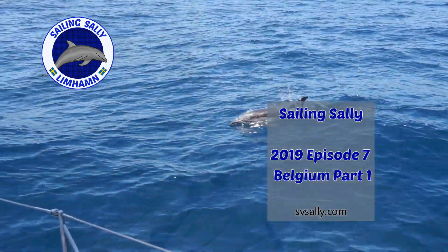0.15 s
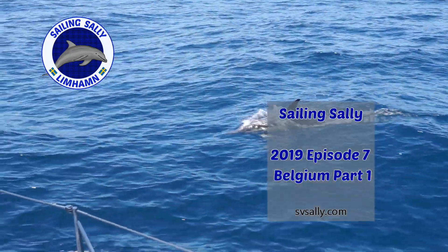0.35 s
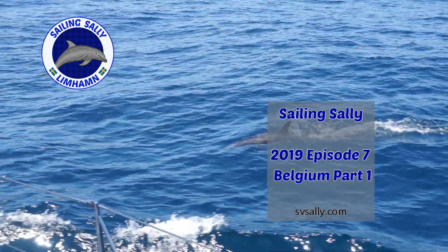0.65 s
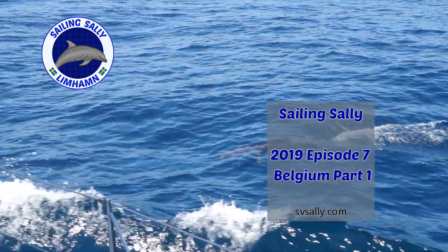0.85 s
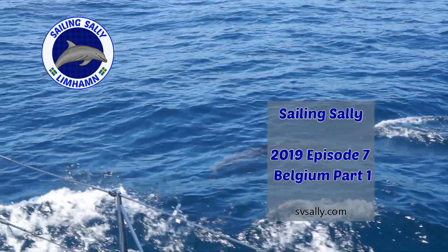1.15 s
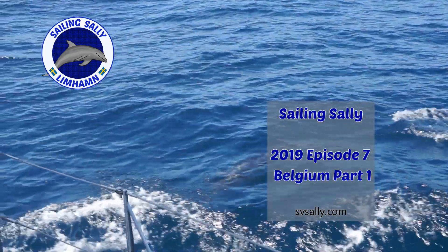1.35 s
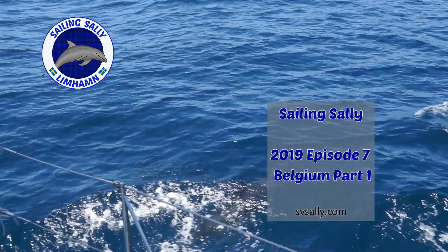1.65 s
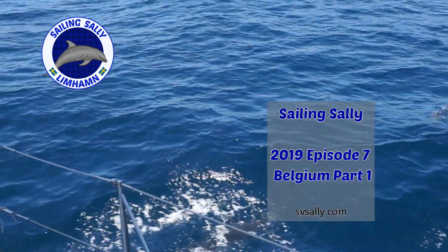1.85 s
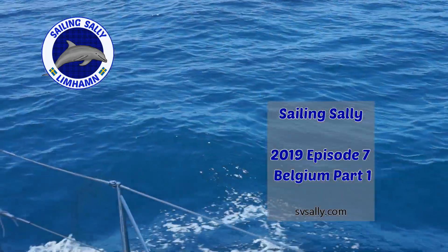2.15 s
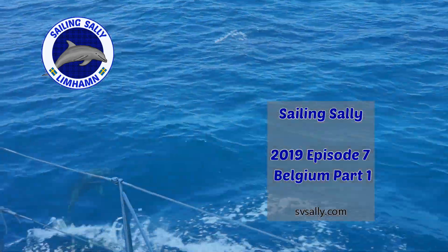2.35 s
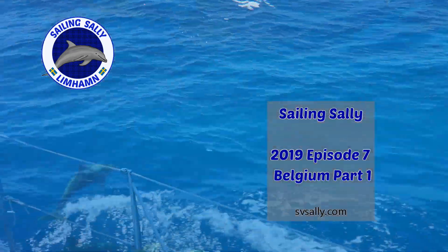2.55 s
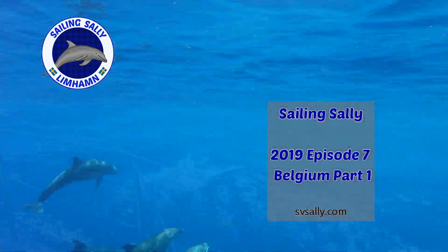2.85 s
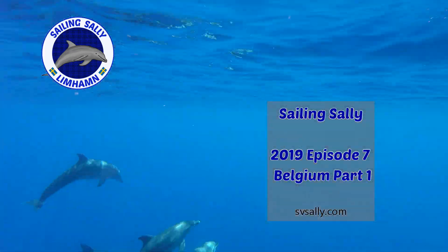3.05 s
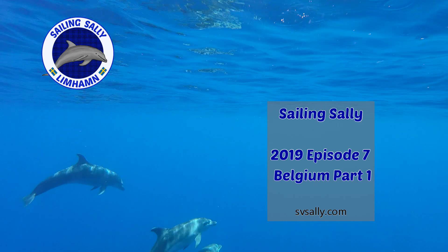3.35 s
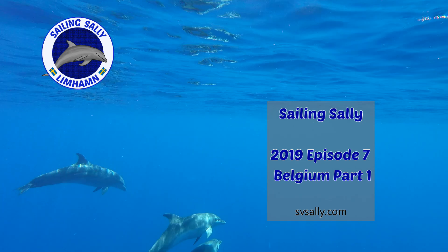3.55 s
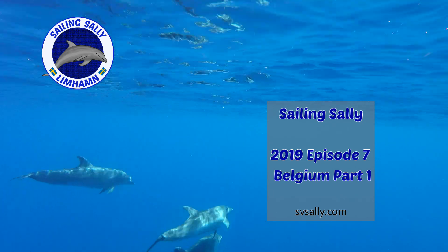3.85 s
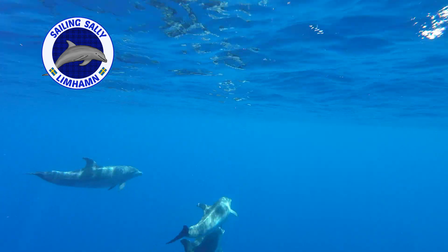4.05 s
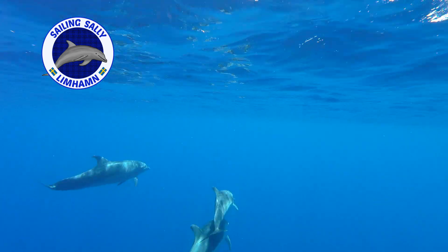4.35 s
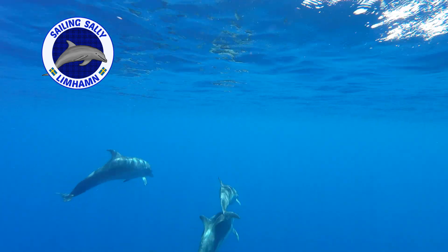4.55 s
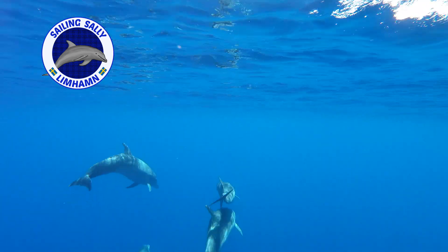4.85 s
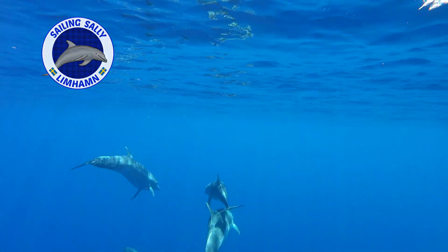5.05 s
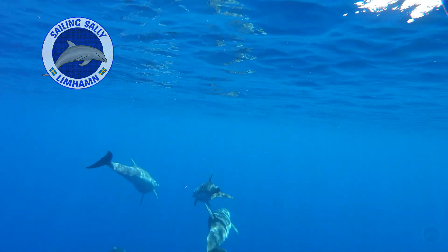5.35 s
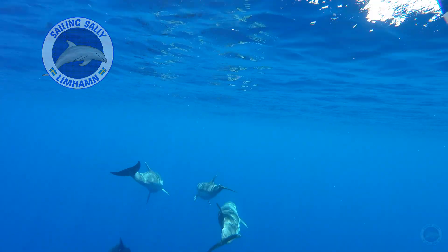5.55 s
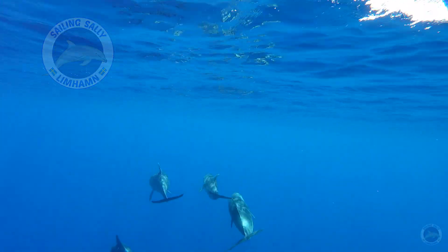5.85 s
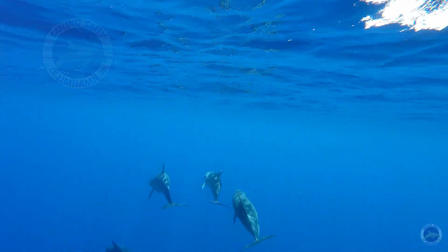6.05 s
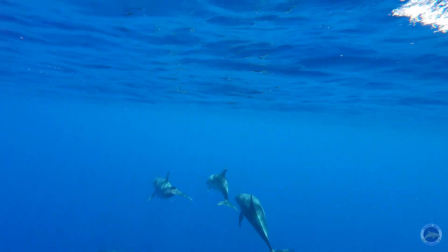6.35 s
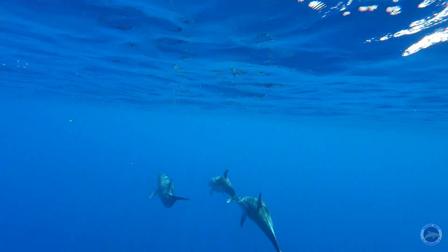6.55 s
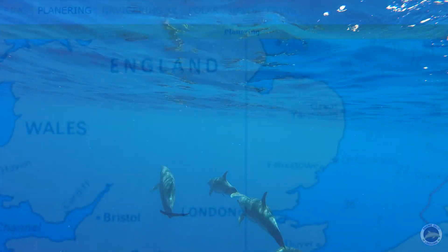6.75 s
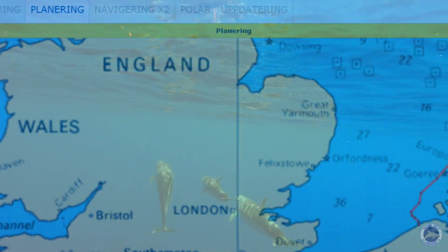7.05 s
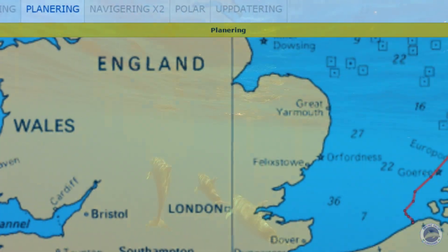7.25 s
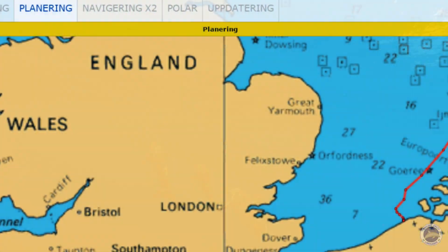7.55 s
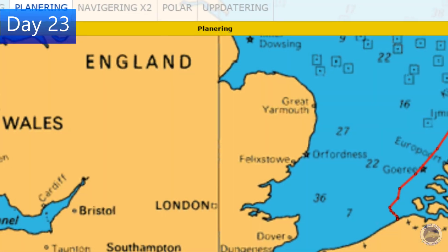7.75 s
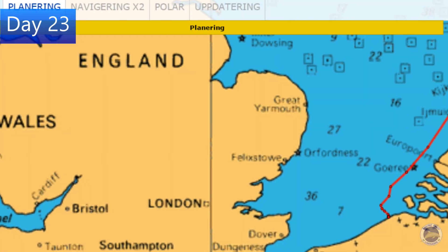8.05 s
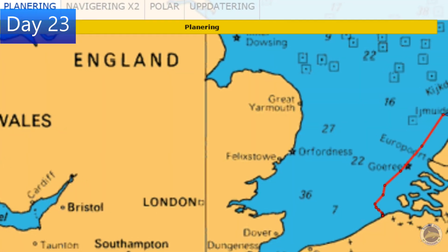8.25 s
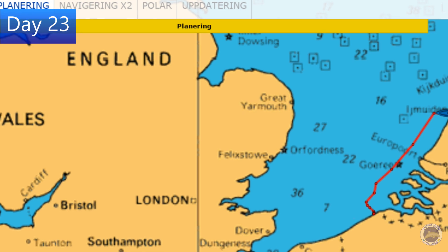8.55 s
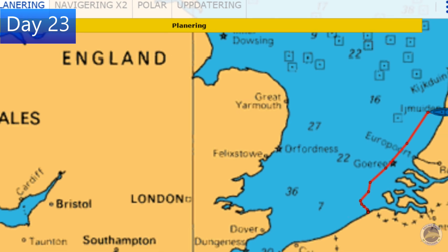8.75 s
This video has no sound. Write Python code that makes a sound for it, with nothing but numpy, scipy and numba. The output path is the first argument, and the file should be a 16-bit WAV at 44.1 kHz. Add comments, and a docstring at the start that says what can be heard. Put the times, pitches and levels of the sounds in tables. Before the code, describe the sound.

For the first two seconds, waves break close by at the bow of a sailing yacht, in stereo: bubbling wash, pattering droplets and hissing foam, with the sharpest splashes around 1.3 seconds. Between 2 and 3 seconds this dissolves into muffled mono sound under water. The flow makes a steady low rumble against a towed camera pole, while bubbles gurgle, fizz and plop dully and irregularly on the housing, with a few sharp ticks. Two very faint, high, falling dolphin whistles come at about 4.1 and 4.9 seconds, and two barely audible high dolphin clicks at about 6.6 and 7 seconds. At 7.6 seconds the sound cuts abruptly back to the deck. Wind rushes and a long wave runs along the hull, its foam sizzling at the crest around 8.5 seconds, followed by a couple of low sloshing surges just before the end, near 9 seconds.

```python
"""Bubbling wash and spray break from the bow of a sailing yacht: trapped air rings as bubbles, and
droplets patter over hissing foam. The sound dissolves to a camera towed under water, where eddies shake
its pole, bubbles gurgle dully through the housing and dolphins whistle and click faintly. Then it is
abruptly back on deck, in wind and the hiss of a long wave. Each bubble is a damped oscillator."""
import sys
import numpy as np
from scipy import signal
from scipy.fft import rfft, irfft
from scipy.io import wavfile
from scipy.ndimage import uniform_filter1d
from numba import njit

SR = 44100
rng = np.random.default_rng(int(sys.argv[2]) if len(sys.argv) > 2 else 0)


def wrap_up_sound(samples):
    """Save the sound to the file named by the first command line argument, as 16-bit audio."""
    columns = np.atleast_2d(samples).T
    # keep every value between -1 and 1, then stretch to whole-number steps
    tamed = np.clip(columns, -1, 1)
    steps = np.round(tamed * 32767).astype(np.int16)
    wavfile.write(sys.argv[1], SR, steps)


N = 392049
T = np.arange(N) / SR
HZ = np.maximum(np.fft.rfftfreq(N, 1 / SR), 1)


def undb(db):
    """Amplitude ratio of a level in decibels."""
    return 10 ** (np.asarray(db) / 20)


def unit(x):
    """Normalisation to an rms of 1."""
    return x / np.sqrt(np.mean(x ** 2))


def curves(rows):
    """Linear interpolation of each column over the times in the first."""
    times, *columns = np.transpose(rows)
    return [np.interp(T, times, column) for column in columns]


def over_hz(points):
    """Interpolation of (frequency [Hz], value) points on a logarithmic frequency axis."""
    hz, value = np.transpose(points)
    return np.interp(np.log(HZ), np.log(hz), value)


def shape(x, gain):
    """Linear filtering: the spectrum is multiplied by a gain per frequency."""
    return irfft(rfft(x) * gain, N)


def band(lo_hz, hi_hz, order=6):
    """Magnitude response of a Butterworth high-pass and low-pass in series."""
    return ((1 + (lo_hz / HZ) ** (2 * order)) * (1 + (HZ / hi_hz) ** (2 * order))) ** -.5


def wander(rate):
    """Smooth random modulation of rms 1, with `rate` new values a second."""
    hold = int(SR / rate)
    steps = np.repeat(rng.standard_normal(N // hold + 2), hold)
    return unit(uniform_filter1d(steps[rng.integers(hold):][:N], hold))


@njit
def ring(times, hz, cycles, size, glide):
    """Damped oscillation: each bubble swells quickly and decays, its pitch rising by the share `glide`."""
    out = np.zeros(N)
    for k in range(len(times)):
        start, length = int(times[k] * SR), int(cycles[k] * SR / hz[k]) + 2
        phase = 0.
        for i in range(min(length, N - start)):
            age = i / length
            phase += 2 * np.pi * hz[k] * (1 + glide * (age - .15)) / SR
            envelope = 2.3 * (1 - np.exp(-18 * age)) * np.exp(-7 * age)
            out[start + i] += size[k] * envelope * np.sin(phase)
    return out


def bubbles(rate, lo_hz, hi_hz, cycles, spread_db, glide=0.24):
    """Random superposition of bubbles, a few of them loud, at the spectral density of unit white noise."""
    when, pitch, sustain, luck = rng.random((int(rate * N / SR), 4)).T
    hz = lo_hz * (hi_hz / lo_hz) ** pitch
    size = hz * undb(-spread_db * np.log(luck + .01))
    cloud = ring(when * N / SR, hz, cycles * (.5 + sustain), size, glide)
    return unit(cloud) * np.sqrt(2 * (hi_hz - lo_hz) / SR)


# Contour of one whistle: (time from onset [s], frequency [Hz], relative level [dB])
WHISTLE_CONTOUR = [(0, 10050, -16), (.05, 9550, -10), (.11, 8650, -11), (.16, 7800, -11), (.22, 7400, -2),
                   (.31, 6900, -1), (.37, 6300, 0), (.405, 6150, -1), (.44, 7400, -18)]
# Dolphin calls: (onset [s], gain [dB], frequency ratio [1])
DOLPHIN_CALLS = [(4.13, -82, 1), (4.935, -87.5, .975)]


def dolphin_whistles():
    """Frequency modulation: a faint, wavering, falling whistle sounds twice, with a surface reflection."""
    direct = 0
    for start, call_db, pitch in DOLPHIN_CALLS:
        hz, db = curves([(start + s, hz, db) for s, hz, db in WHISTLE_CONTOUR])
        phase = 2 * np.pi * np.cumsum(pitch * hz * (1 + .005 * wander(200))) / SR
        waver = undb(3 * wander(50) - 5)
        sounding = (T > start) & (T < start + WHISTLE_CONTOUR[-1][0])
        direct = direct + np.sin(phase) * undb(call_db + db) * waver * sounding
    reflection = undb(-9) * np.roll(direct, int(.012 * SR))
    return direct + reflection


# Modes of the camera pole: (frequency [Hz], nominal width [Hz], relative level [dB])
POLE_MODES = [(29.5, 31, -2), (57, 27, 0), (76.3, 23, 0.5), (106, 5, -2), (126.5, 18, -4)]
# Rumble of the flow past the pole: (time [s], level [dB])
FLOW_LEVELS = [(2.2, -31), (2.84, -30.5), (2.93, -30), (3.86, -31), (3.94, -35.5), (4.64, -30),
               (7.36, -32.5), (7.48, -38.5), (7.6, -34.5)]


def pole_rumble():
    """Forced vibration: eddies buffet the camera pole, which booms in its low modes."""
    power = sum(undb(2 * db) / (1 + ((HZ ** 2 - hz ** 2) / (HZ * width)) ** 2) ** 1.93
                for hz, width, db in POLE_MODES)
    boom = unit(shape(rng.standard_normal(N), np.sqrt(power)))
    # the steady tow keeps the buffeting even from moment to moment
    running_rms = np.sqrt(uniform_filter1d(uniform_filter1d(boom ** 2, size=3000), size=1500))
    flow_db, = curves(FLOW_LEVELS)
    return boom / running_rms * undb(flow_db)


# Transmission through the housing: (frequency [Hz], relative gain [dB])
HOUSING_RESPONSE = [(60, -27), (170, -11.5), (245, -14), (330, -15.5), (520, -15.5), (700, -12.5),
                    (880, -11), (1100, -23), (1350, -28), (2400, -36.5), (2900, -48), (3400, -59.5),
                    (4000, -76), (6000, -82.5)]
# Large air pockets churning round the pole: (time [s], level [dB])
CHURN_LEVELS = [(2.7, -43), (2.93, -39.5), (3.72, -42.5), (4.04, -47.5), (5.0, -38.5), (5.1, -44.5),
                (5.75, -41), (5.93, -37.5), (6.07, -37), (6.22, -47), (6.8, -49), (7.12, -42.5),
                (7.41, -35.5), (7.6, -35.5)]
# Bubble trains shed by the pole: (time [s], gain [dB], frequency [Hz])
BUBBLE_TRAINS = [(2.6, -37, 918), (2.7, -35.5, 490), (2.82, -40.5, 601), (2.93, -34, 782), (3.08, -38, 818),
                 (3.26, -33.5, 585), (3.6, -36, 716), (3.65, -35.5, 486), (4.21, -34, 747),
                 (4.31, -35.5, 539), (4.39, -38, 688), (4.52, -41.5, 642), (4.79, -41, 697),
                 (4.86, -34, 568), (4.98, -41, 735), (5.1, -36.5, 716), (5.33, -38, 717), (5.57, -37, 660),
                 (5.73, -33.5, 750), (5.9, -38.5, 493), (6.03, -36.5, 741), (6.15, -37.5, 750),
                 (6.24, -34.5, 681), (6.41, -34.5, 705), (6.49, -36, 776), (7.16, -37, 796),
                 (7.34, -34, 485), (7.4, -33, 648), (7.58, -38, 630)]
# Fizz of small bubbles: (time [s], level [dB])
FIZZ_LEVELS = [(2.8, -57.5), (3.08, -47), (3.42, -54), (3.65, -46.5), (3.97, -59), (4.2, -56.5),
               (4.32, -65.5), (4.6, -56), (4.85, -58), (5.06, -56.5), (5.42, -54.5), (5.74, -57.5),
               (5.95, -58.5), (6.17, -49.5), (6.34, -50.5), (6.65, -55), (6.82, -46.5), (7.03, -57.5),
               (7.35, -50), (7.6, -53)]


def gurgle():
    """Transmission loss: the housing dulls the churn, gurgle and fizz of air dragged down by the pole."""
    churn_db, = curves(CHURN_LEVELS)
    gurgle_db, train_hz = curves(BUBBLE_TRAINS)
    fizz_db, = curves(FIZZ_LEVELS)
    wall = undb(over_hz(HOUSING_RESPONSE))
    large = bubbles(rate=350, lo_hz=129.8, hi_hz=1311, cycles=38, spread_db=2.5)
    small = bubbles(rate=800, lo_hz=1320, hi_hz=3400, cycles=16, spread_db=3.7, glide=.08)
    cloud = large + small + undb(-3) * rng.standard_normal(N)
    bands_hz = [(100, 420), (420, 1200), (1200, 2600), (2600, 14000)]
    churn, rush, fizz, fine = (unit(shape(cloud, wall * band(lo, hi, order=8))) for lo, hi in bands_hz)
    # bubbles shed together, 110 a second, are of nearly one size
    when, luck, scatter = rng.random((int(110 * N / SR), 3)).T
    hz = train_hz[(when * (N - 1)).astype(int)] * 2 ** (.75 * (scatter - .55))
    train = ring(when * N / SR, hz, cycles=22 + 20 * luck, size=undb(2 * luck), glide=0.13)
    gurgling = (undb(-4.5) * rush + undb(-5) * unit(shape(train, wall))) * undb(gurgle_db)
    fine_db = -66.5 + 0.13 * (fizz_db - fizz_db.mean())  # the smallest follow the fizz only weakly
    clusters = undb(2 * wander(rate=32))  # small bubbles arrive in clusters
    fizzing = (fizz * undb(fizz_db) + fine * undb(fine_db)) * clusters
    return churn * undb(churn_db) + gurgling + fizzing


# Large bubbles plopping against the housing: (time [s], level [dB], frequency [Hz])
HOUSING_PLOPS = [(2.407, -24.5, 644), (2.606, -25, 824), (2.65, -34.5, 1689), (2.655, -26.5, 810),
                 (2.676, -26, 419), (2.744, -24, 535), (2.889, -37.5, 1300), (2.978, -29, 800),
                 (3.042, -26, 689), (3.069, -23.5, 910), (3.072, -34.5, 1690), (3.118, -26.5, 730),
                 (3.207, -29.5, 605), (3.207, -35, 1380), (3.264, -30, 525), (3.282, -29.5, 699),
                 (3.337, -29, 727), (3.357, -33, 576), (3.599, -33, 1850), (3.659, -24.5, 443),
                 (3.718, -35, 1620), (3.794, -28.5, 450), (3.83, -37, 1900), (3.84, -25, 430),
                 (3.876, -30, 510), (3.899, -25.5, 640), (3.997, -27.5, 578), (4.055, -28, 708),
                 (4.078, -37, 1380), (4.098, -26.5, 753), (4.136, -39, 1510), (4.145, -25, 750),
                 (4.213, -22.5, 792), (4.213, -34, 1248), (4.27, -26, 666), (4.288, -22.5, 507),
                 (4.372, -26, 713), (4.407, -42, 1315), (4.413, -29, 743), (4.446, -27, 721),
                 (4.448, -45, 1350), (4.525, -27, 590), (4.598, -25, 590), (4.641, -24.5, 570),
                 (4.734, -29, 877), (4.746, -24, 877), (4.827, -24, 632), (4.843, -33, 446),
                 (4.868, -27.5, 556), (4.881, -42, 1940), (4.911, -43.5, 1360), (4.921, -25, 810),
                 (4.931, -26.5, 795), (4.993, -40, 1400), (5.057, -25.5, 702), (5.079, -26.5, 757),
                 (5.131, -36, 2010), (5.27, -27, 644), (5.334, -35, 1300), (5.393, -34.5, 1540),
                 (5.399, -29, 526), (5.458, -39.5, 1750), (5.54, -38.5, 2380), (5.611, -37, 1446),
                 (5.682, -39, 1515), (5.717, -27.5, 840), (5.762, -26.5, 684), (5.782, -28.5, 408),
                 (5.801, -24, 702), (5.801, -41, 1720), (5.961, -27, 698), (5.987, -32, 1346),
                 (6.171, -37, 1740), (6.202, -28, 850), (6.238, -25.5, 680), (6.256, -38, 1570),
                 (6.292, -28, 680), (6.305, -26.5, 666), (6.31, -33.5, 1475), (6.349, -25, 750),
                 (6.391, -29, 670), (6.408, -27, 930), (6.446, -34.5, 1900), (6.446, -26, 980),
                 (6.484, -25, 680), (6.642, -25.5, 885), (6.825, -37, 1400), (6.908, -38, 1525),
                 (6.99, -29, 792), (7.019, -24.5, 740), (7.065, -24.5, 733), (7.086, -38, 1375),
                 (7.136, -34, 1650), (7.175, -24, 790), (7.197, -30, 305), (7.278, -36.5, 1800),
                 (7.284, -27.5, 225), (7.313, -28.5, 446), (7.368, -26, 234), (7.41, -26, 240),
                 (7.416, -34, 742), (7.474, -38, 2020), (7.5, -26, 588), (7.51, -23.5, 773),
                 (7.602, -25, 820)]
# Sharp ticks under water, and two faint, high bursts of dolphin clicks (at 6.625 s and 7.025 s):
# (time [s], level [dB], frequency [Hz], duration [cycles])
TICKS_AND_CLICKS = [(3.656, -53, 2000, 3.2), (4.746, -42.5, 2000, 3.2), (5.058, -40, 1990, 3.6),
                    (5.402, -50, 2010, 2.8), (6.329, -43, 2000, 3.5), (6.447, -46, 2000, 3.2),
                    (6.625, -68, 7500, 45), (7.025, -69.5, 7200, 18), (7.358, -63, 4280, 5),
                    (7.423, -61.5, 2000, 3.2)]


def plops_and_clicks():
    """Damped transients: bubbles plop on the housing amid sharp ticks, dolphin clicks and faint crackle."""
    times, db, hz = np.array(HOUSING_PLOPS, float).T.copy()
    plops = ring(times, hz, cycles=rng.uniform(20.313, 29.463, len(times)), size=undb(db), glide=0.11)
    times, db, hz, cycles = np.array(TICKS_AND_CLICKS, float).T.copy()
    clicks = ring(times, hz, cycles, undb(db), glide=0.12)
    crackle = unit(bubbles(rate=60, lo_hz=3500, hi_hz=8000, cycles=7, spread_db=3.5)) * undb(-102)
    return shape(plops, band(100, 3900, order=8)) + shape(clicks + crackle, band(500, 9000, order=4))


# Likeness of the two deck microphones: (frequency [Hz], correlation before scaling by `likeness` [1])
DECK_CORRELATION = [(60, .7), (130, .6), (300, 0.75), (650, 0.95), (1400, 0.84), (3100, 0.12), (7000, .02)]


def stereo_pair(source, likeness):
    """Partial coherence: two draws of a source mix to channels alike in the bass, unlike in the treble."""
    correlation = np.clip(likeness * over_hz(DECK_CORRELATION), -.99, .99)
    mid = shape(source(), np.sqrt(1 + correlation))
    side = shape(source(), np.sqrt(1 - correlation))
    return np.array([mid + side, mid - side])


# Waves breaking beside the boat: (crest time [s], slosh level [dB], wash level [dB], spray level [dB],
# rise constant [s], decay constant [s], left minus right [dB])
WAVE_CRESTS = [(0.053, -42, -39, -35.5, 0.022, 0.027, -3), (0.235, -49.5, -41, -37.5, 0.075, 0.37, 0),
               (0.33, -54, -50, -47, 0.04, 0.09, 0.5), (0.39, -50.5, -37, -36, 0.12, 0.33, 2.5),
               (0.59, -52, -46, -41.5, 0.088, 0.04, -10), (0.785, -50, -34.5, -34.5, 0.17, 0.11, 4),
               (0.84, -52, -38.5, -35.5, 0.04, 0.11, 0), (1.0, -50.5, -40, -41.5, 0.056, 0.22, 5),
               (1.165, -62, -34, -33.5, 0.081, 0.074, 0.5), (1.295, -67, -36.5, -30.5, 0.062, 0.04, -0.5),
               (1.333, -65, -35, -31.5, 0.019, 0.045, -1), (1.467, -70, -49, -42.5, 0.034, 0.068, -2),
               (1.68, -55, -44.5, -43, 0.08, 0.13, -2.5), (2.15, -62, -70, -43.5, 0.096, 0.24, -1),
               (2.44, -41.5, -37, -34, 0.12, 0.22, -0.5), (2.84, -45.5, -47.5, -40, 0.19, 0.15, 0),
               (7.69, -36.5, -56.5, -53.5, 0.025, 0.088, -6.5), (8.17, -54, -37.5, -54, 0.084, 0.21, 1),
               (8.47, -41, -39, -37.5, 0.27, 0.73, -3.5), (8.645, -57, -40.5, -38, 0.19, 0.12, -5),
               (8.742, -28, -36, -48, 0.028, 0.046, -1), (8.86, -33, -38, -43, 0.035, 0.07, 4)]


def water_levels(steady_db):
    """Power addition of waves and steady water: slosh, wash and spray levels [dB] at each microphone."""
    crest_s, slosh_db, wash_db, spray_db, rise_s, fall_s, pan_db = np.transpose(WAVE_CRESTS)
    age = T - crest_s[:, None]
    from_crest = np.maximum(-age / rise_s[:, None], age / fall_s[:, None])  # in time constants
    swells = np.exp(-np.minimum(from_crest, 20))
    sides_db = np.array([pan_db, -pan_db]) / 2
    crests = undb([[slosh_db, slosh_db], wash_db + sides_db, spray_db + sides_db])
    return 10 * np.log10(undb(steady_db)[:, None, None] ** 2 + crests ** 2 @ swells ** 2)


def breaking_waves(spectrum, levels_db, bubble_db, drop_db, flicker_db, likeness):
    """Incoherent sources add: heavy water sloshes, entrained bubbles ring, drops patter, foam hisses."""
    def water():
        ringing = bubbles(rate=600, lo_hz=220.7, hi_hz=4080, cycles=27.3, spread_db=1)
        patter = bubbles(rate=1800, lo_hz=2090, hi_hz=15300, cycles=8.8, spread_db=3.5)
        return rng.standard_normal(N) + undb(bubble_db) * ringing + undb(drop_db) * patter
    surf = stereo_pair(water, likeness)
    surge = wander(35)
    slosh_band, spray_band = band(20, 400, order=3) ** 2, band(3000, 40000, order=3) ** 2
    wash_band = np.clip(1 - slosh_band - spray_band, 0, 1) * band(100, 40000)
    out = 0
    for gain, db in zip([slosh_band, wash_band, spray_band], levels_db):
        flicker = flicker_db * (surge + wander(25))  # partly shared, partly each band's own
        out = out + unit(shape(surf, undb(over_hz(spectrum)) * gain)) * undb(db + flicker)
    return out


# Spectrum of wind and water along the hull: (frequency [Hz], relative level [dB])
HULL_SPECTRUM = [(18, -44), (30, -22), (100, 0.5), (239, 3.5), (449, -3), (702, -5.5), (1070, -5),
                 (1280, -9.5), (2540, -14), (4780, -22.5), (8300, -24), (11100, -24), (14800, -24),
                 (16000, -30)]


def hull_wave():
    """Broadband noise: wind and a long wave run along the side, and the foam sizzles at the crest."""
    steady_slosh_db, steady_wash_db, steady_spray_db = -44.5, -37, -44.5
    levels_db = water_levels([steady_slosh_db, steady_wash_db, steady_spray_db])
    wave = breaking_waves(HULL_SPECTRUM, levels_db,
                          bubble_db=-8.5, drop_db=-7.5, flicker_db=0.08, likeness=0.75)
    foam = stereo_pair(
        lambda: bubbles(rate=3200, lo_hz=10100, hi_hz=12800, cycles=24, spread_db=4, glide=.05),
        likeness=.5)
    sizzle_db = -55.5 + 1.6 * (levels_db[2] - steady_spray_db)  # grows faster than the spray
    left, right = wave + unit(foam) * undb(sizzle_db)
    return np.array([np.roll(left, 4), right])  # later on the left, so heard a little to the right


# Bubble swarms in the bow wave: (onset [s], level [dB], centre frequency [Hz], duration [s])
BUBBLE_SWARMS = [(0.038, -41, 3100, 0.032), (0.172, -45, 3060, 0.063), (0.288, -46.5, 279, 0.092),
                 (0.394, -38, 2000, 0.022), (0.74, -38, 1010, 0.024), (.762, -39.5, 1900, .065),
                 (0.871, -36.5, 2220, .04), (0.979, -41, 766, .035), (1.236, -42, 292, 0.017),
                 (1.265, -38, 1540, 0.069), (1.81, -49, 1470, 0.025)]


def swarms(count=12, spread_octaves=0.31, mean_cycles=18):
    """Bubble resonance: trapped air breaks into swarms of nearly one size, hence nearly one pitch."""
    out = 0
    for start, db, centre_hz, length_s in BUBBLE_SWARMS:
        when, scatter, luck = rng.random((3, count))
        times = start + length_s * (np.arange(count) + when) / count
        hz = centre_hz * 2 ** (spread_octaves * (scatter - .5))
        swarm = ring(times, hz, mean_cycles * (.5 + luck), size=.5 + luck, glide=0.1)
        rms = np.sqrt(np.sum(swarm ** 2) / (length_s * SR))
        out = out + swarm / rms * undb(db)
    return out


# Slaps and drops near by: (time [s], level [dB], frequency [Hz], duration [cycles])
WATER_SLAPS = [(.036, -30.5, 547, 89), (.047, -35, 745, 30), (.051, -38, 1343, 45), (.225, -31.5, 670, 29),
               (.352, -15, 6980, 6), (.38, -24, 421, 30), (.391, -30, 580, 24), (.445, -24, 6500, 7),
               (.482, -32, 690, 22), (.512, -31, 590, 28), (.608, -32.5, 770, 22), (.685, -29.5, 740, 25),
               (.753, -38, 854, 22), (0.777, -27, 3000, 4), (0.842, -22, 6030, 5), (.912, -29, 864, 28),
               (.938, -29.5, 742, 25), (.988, -32.5, 670, 30), (1.225, -28, 817, 20),
               (1.233, -12.5, 6500, 10), (1.282, -28.5, 1624, 27), (1.289, -19.5, 9020, 7.3),
               (1.311, -29.5, 1550, 33), (1.338, -18.5, 1000, 11), (1.3378, -18, 1630, 10),
               (1.339, -25.5, 643, 8), (1.464, -31, 846, 9), (1.553, -35, 780, 13), (1.8, -33, 545, 12.6),
               (2.125, -26.5, 407, 21), (2.172, -24, 12400, 90), (2.541, -21, 7000, 7)]


def slaps():
    """Impact transients: water slaps and drops land, each ringing briefly."""
    times, db, hz, cycles = np.array(WATER_SLAPS, float).T.copy()
    return shape(ring(times, hz, cycles, undb(db), glide=0.2), band(520, 19930, order=3))


# Spectrum of the bow wave: (frequency [Hz], relative level [dB])
BOW_SPECTRUM = [(18, -59.5), (30, -23), (103, -12.5), (179, -10), (215, -9), (280, -7), (355, -7.5),
                (415, -7), (473, -2.5), (600, 4), (1760, 0), (4650, -18), (10800, -20), (16000, -25)]


def bow_wave():
    """Air entrainment: the bow throws wave after wave, and the finest bubbles burst in the foam."""
    levels_db = water_levels(steady_db=[-53.5, -47.5, -48])
    wave = breaking_waves(BOW_SPECTRUM, levels_db,
                          bubble_db=-4, drop_db=0.5, flicker_db=0.8, likeness=0.95)
    foam = stereo_pair(lambda: bubbles(rate=3700, lo_hz=8300, hi_hz=14800, cycles=7.2, spread_db=3),
                       likeness=0.6)
    swarming = stereo_pair(swarms, likeness=0.8) / np.sqrt(2)
    left, right = wave + unit(foam) * undb(-48) + swarming + slaps()
    return np.array([left, np.roll(right, 2)])  # later on the right, so heard slightly to the left


def scene():
    """Crossfades: the deck dissolves to single-channel sound under water, then returns abruptly."""
    dive_s, dissolve_s, surface_s, cut_s = 1.945, 1, 7.622, 0.005
    dived = np.clip((T - dive_s) / dissolve_s, 0, 1)
    surfaced = np.clip((T - surface_s) / cut_s, 0, 1)
    underwater = pole_rumble() + gurgle() + plops_and_clicks() + dolphin_whistles()
    return (1 - dived) * bow_wave() + dived * (1 - surfaced) * underwater + surfaced * hull_wave()


def record(dry, cutoff_hz=15900):
    """Band limiting: the camera's steep low-pass filter removes the highest treble."""
    return signal.sosfilt(signal.ellip(10, .1, 80, cutoff_hz, fs=SR, output="sos"), dry)


dry = scene()
out = record(dry)
wrap_up_sound(out)
```